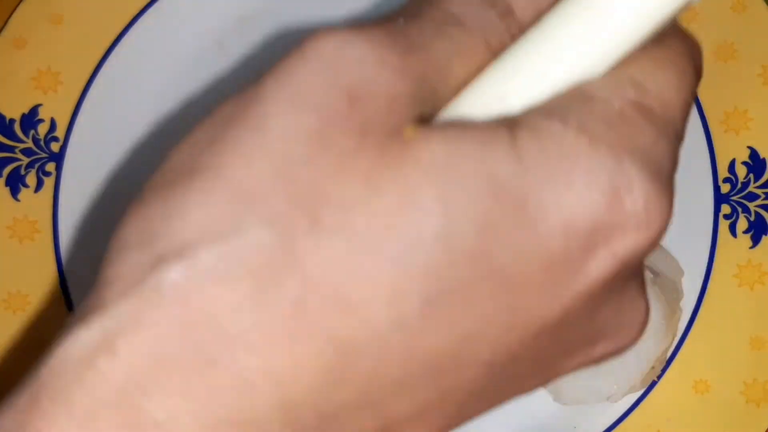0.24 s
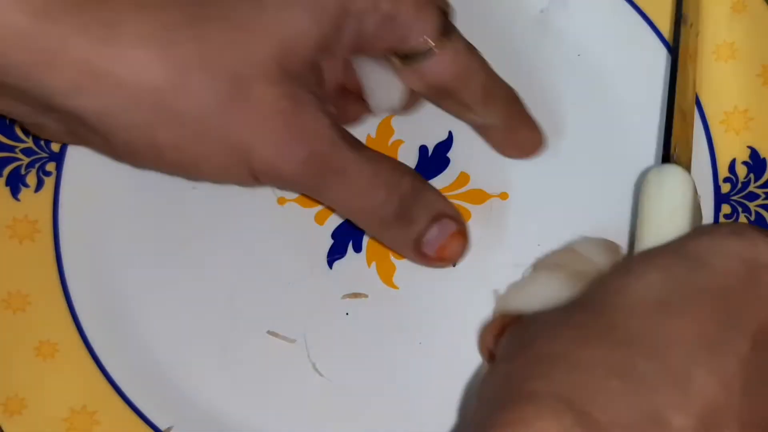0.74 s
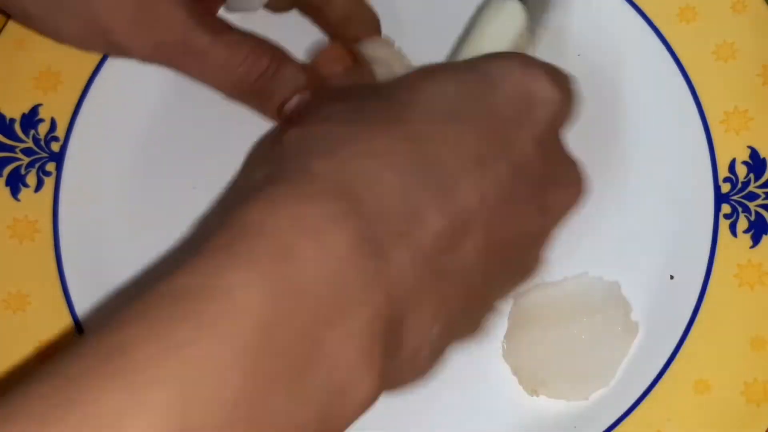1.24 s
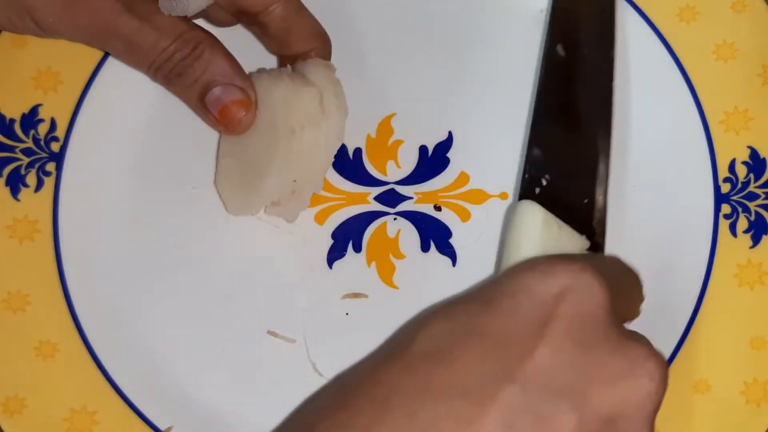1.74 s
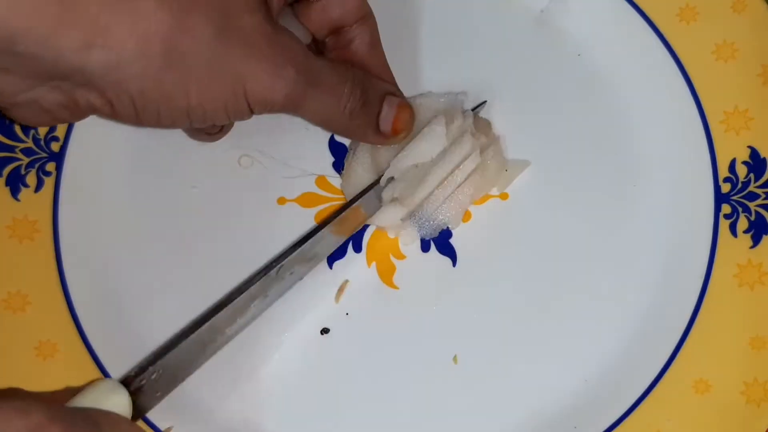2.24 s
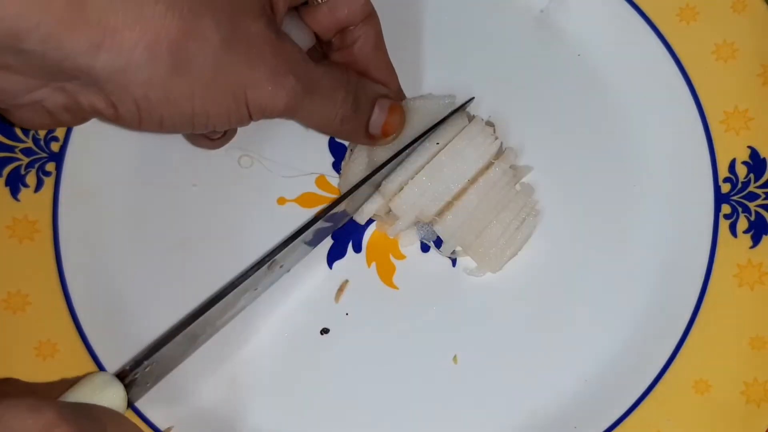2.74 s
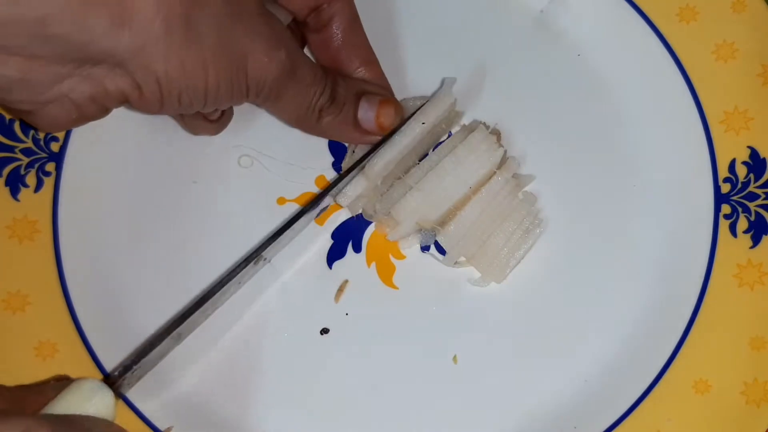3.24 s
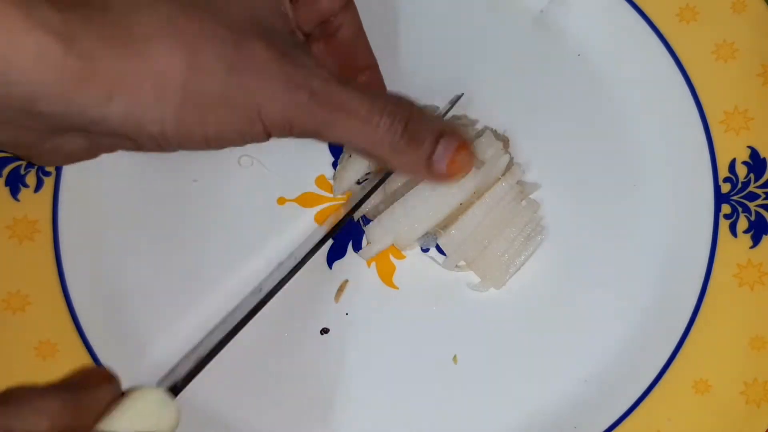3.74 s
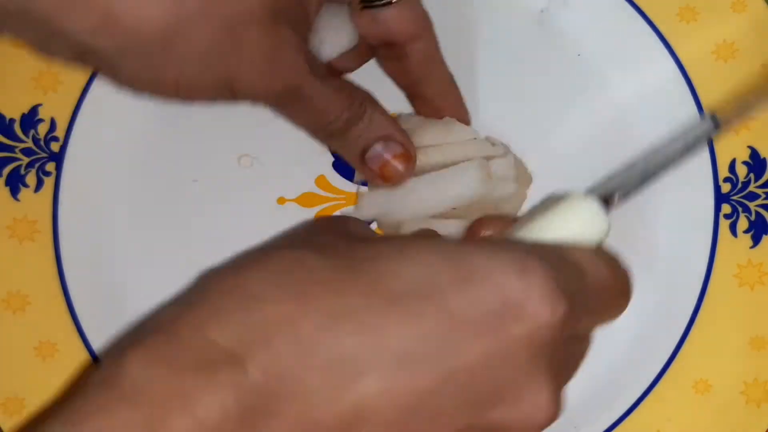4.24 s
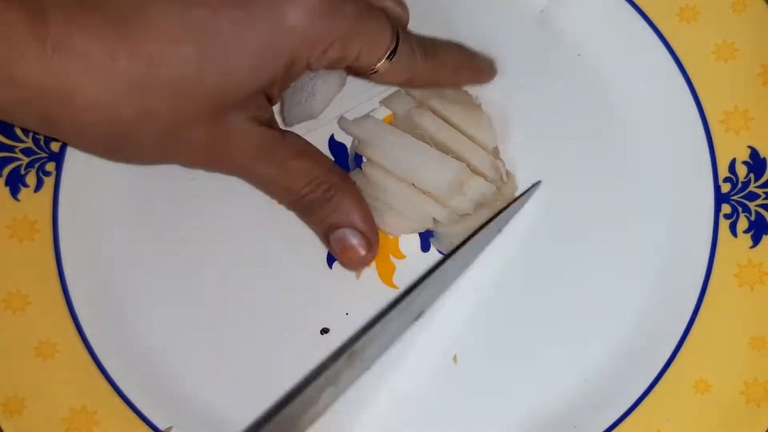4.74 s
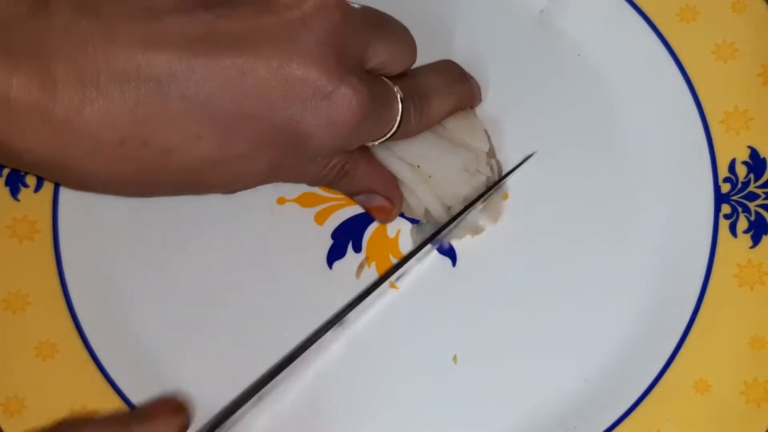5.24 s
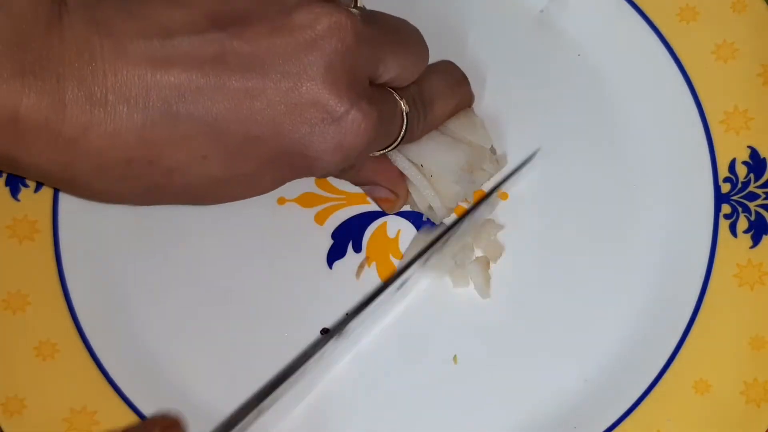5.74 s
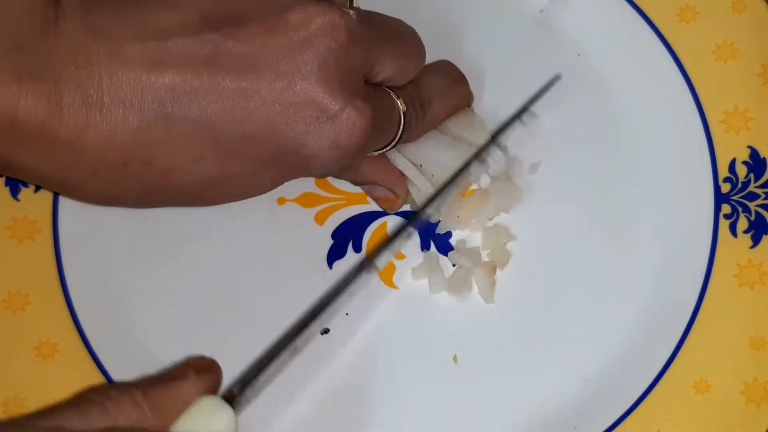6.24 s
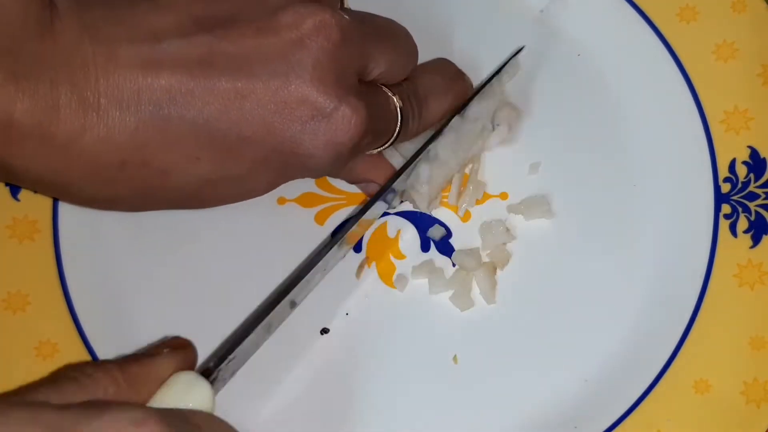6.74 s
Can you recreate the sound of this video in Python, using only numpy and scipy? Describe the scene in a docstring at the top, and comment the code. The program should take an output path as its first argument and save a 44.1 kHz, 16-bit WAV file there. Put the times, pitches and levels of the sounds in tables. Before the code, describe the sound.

A ceramic plate ticks, knocks and buzzes briefly as vegetable pieces are moved, with a short scrape. Then a knife creaks and crunches through the firm flesh three times, each cut ending in a hard click and muffled table thud. A double clack precedes five short, moist, crunchy dicing strokes, evenly spaced. Close microphones, dry small room, soft low room hum and a barely audible high whine.

```python
"""A kitchen knife slices a firm vegetable on a plate, close to a stereo microphone in a small room.
First the pieces are set down and the plate clatters; then three slices each crunch and land with a thud;
at last five quicker, wetter strokes dice them. Filtered random snaps make the cutting and the sliding,
decaying modes make the plate, damped sines make the thuds; sparse echoes, a rumble and a faint whine
make the room."""
import sys
import numpy as np
from scipy import signal
from scipy.fft import rfft, irfft, next_fast_len
from scipy.io import wavfile
from scipy.ndimage import uniform_filter1d

SR = 44100
rng = np.random.default_rng(int(sys.argv[2]) if len(sys.argv) > 2 else 0)


def file_out(sig):
    """Save sig as 16-bit WAV at sys.argv[1]."""
    # one column per channel
    cols = np.atleast_2d(sig).T
    # limit, then scale
    lim = np.clip(cols, -1, 1)
    pcm = np.round(lim * 32767).astype(np.int16)
    wavfile.write(sys.argv[1], SR, pcm)


N = 308259
TIME = np.arange(N) / SR
AGE = TIME[:SR // 8]  # seconds since a contact

# Knife strokes. Each row: landing of the blade in seconds, time to sink through in s,
# shearing effort just before landing in dB, dragging effort afterwards in dB.
STROKES = [(2.283, .16, -57.5, -53), (2.811, 0.19, -61.5, -56), (3.373, .16, -59.5, -55),
           (5.148, 0.034, -42, -53.5), (5.556, 0.037, -42, -48), (6.013, 0.037, -34, -50),
           (6.453, 0.037, -37, -47.5), (6.917, 0.045, -35, -49)]
# Wet pieces flicked by the blade. Each row: time in seconds, effort in dB.
FLICKS = [(2.85, -38), (5.112, -36), (5.266, -49.5), (5.721, -51.5), (6.161, -38.5)]
# Spectrum of bursting cells. Each row: frequency in Hz, relative level in dB.
CELL_SPECTRUM = [(150, -12), (320, 2), (800, -1), (1100, -8.5), (1600, -3), (2300, -9), (4000, -13.5),
                 (7500, -18), (10000, -19.5), (16000, -24.5)]
# Spectrum of juice fizz and of sliding friction. Each row: frequency in Hz, relative level in dB.
FRICTION_SPECTRUM = [(300, -14.5), (1200, -4), (2500, -0.5), (4500, -3.5), (7000, -0.5), (10000, -7),
                     (13000, 0), (16000, 0)]
# Flesh cracking ahead of the blade. Each row: middle in seconds, relative level in dB, resonance in Hz.
CRUNCHES = [(2.167, -35.5, 960), (2.210, -27.5, 910), (2.279, -31, 893), (2.655, -39, 931.6),
            (2.68, -29.5, 847.3), (2.697, -27.5, 969.4), (3.21, -47.5, 1300), (3.235, -36, 1160),
            (3.263, -32, 1029), (3.327, -29, 915), (3.37, -33, 940), (6.858, -40, 1200)]
# Spectrum of snapping fibres for a 1000 Hz resonance. Each row: frequency in Hz, relative level in dB.
FIBRE_SPECTRUM = [(100, -15.5), (300, -11.5), (600, 1), (950, -1.5), (1400, -3.5), (1900, -18),
                  (3000, -26.5), (8000, -31), (16000, -31)]
# Blows on the plate. Each row: start in seconds, relative ring level in dB, ring centre in Hz,
# click level in dB, click tilt in dB per octave, relative level of the hollow knock in dB,
# knock centre in Hz, factor on the decay times, delay of the rebound in s (1 ms or less: no rebound).
BLOWS = [(0.604, -20, 1610, -21.5, 2, -23, 390, 1.1, 0.0028),
         (0.698, -21, 1880, -23, -4, -25, 784, 0.67, 0.0076),
         (1.135, -61, 1600, -40.5, 1.5, -49.5, 416, 1, 0.000087),
         (1.188, -45, 1710, -40, -10, -40, 746, 1.3, 0.00096),
         (1.297, -38, 1600, -33, -2, -30, 534, 0.61, 0.012),
         (1.342, -20, 1950, -15.5, -2.2, -19.5, 240, 0.88, 0.00019),
         (1.345, -20.5, 1550, -21, -6, -13, 560, .9, .0065),
         (1.377, -27, 1920, -33, -0.5, -31, 650, 1.2, 0),
         (1.443, -45.5, 2099, -46, 4, -68, 487, 0.45, 0.00066),
         (1.628, -20, 1800, -22.5, 2, -20.5, 595, 1, .003),
         (1.699, -40.5, 1904, -49, -11, -44, 699.4, 0.84, 0),
         (1.922, -27, 1840, -35, -2.5, -31.5, 648, 2.8, 0.00087),
         (1.955, -27.5, 1980, -44, 1.5, -33.5, 502, 1.33, 0.00077),
         (2.283, -21, 1440, -12, -1, -25.5, 550.2, 0.81, 0.00025),
         (2.533, -44, 1520, -51, -9.5, -50, 783, 0.72, 0),
         (2.811, -20.5, 1540, -16.5, 0, -26, 290, 1.545, 0),
         (3.3733, -18, 1490, -14.5, -2.5, -25.5, 624, 0.8, 0.000083),
         (4.6656, -14, 1441, -14.5, 0, -22.5, 666, 1.423, 0.013),
         (4.805, -42.5, 1480, -53, -7.5, -49.5, 618, 0.96, 0.00024),
         (5.111, -51, 1450, -40, -1, -41.5, 491, 1.5, 0),
         (5.146, -20.5, 1889, -25.5, -1, -32, 449, 0.7, 0.011),
         (5.5565, -14.5, 1940, -16, 0, -26, 362.7, 0.39, 0.00017),
         (5.713, -39, 1592, -51, -2.5, -70.5, 610, 0.63, 0.00096),
         (6.0154, -22, 1670, -16, -0.5, -25.5, 422.7, 0.52, 0.00063),
         (6.453, -24, 1599, -18, -0.5, -28.5, 380, 1.058, 0.00018),
         (6.667, -62, 1504, -47, 13, -46.5, 652, 0.94, 0),
         (6.917, -33, 1850, -28, -7, -29, 453.7, 0.87, 0.00083)]
# Modes of the plate. Each row: frequency in Hz, relative level in dB, nominal 60 dB decay time in s,
# phase between the two microphones in rad.
PLATE_MODES = [(1338, -7, 0.037, 2), (1473, 1, 0.053, 1.8), (1680, -8, 0.057, -1.26),
               (1757, -1.5, 0.033, 5), (1852, -4, 0.04, 2), (2042, -4, 0.05, -1.16),
               (2464, -3.5, 0.042, -1.5), (3210, -15.5, .04, 4), (3310, -13.5, 0.082, -1),
               (3770, -13.5, 0.094, -1.5), (4460, -16.5, 0.14, 0.5), (5300, -17.5, 0.12, -0.5),
               (6320, -19, 0.077, 1), (6370, -12.5, 0.12, 3), (7900, -17, 0.11, 0)]
# Modes of the plate rocking on the table, with the hollow under it. Each row: frequency in Hz,
# relative level in dB, nominal 60 dB decay time in s, phase between the two microphones in rad.
HOLLOW_MODES = [(234.9, -9, 0.14, 0.94), (327, -3.5, 0.099, -0.22), (424.5, -1, .055, 0.4),
                (500, -4.5, 0.055, -1.2), (570.4, 0, 0.061, -2.3), (733.5, 2, 0.052, 0.78),
                (820, -2, 0.049, 0.52), (896.3, 0.5, 0.038, 0.31)]
# Spectrum of hard contact. Each row: frequency in Hz, relative level in dB.
CLICK_SPECTRUM = [(80, -17), (300, -1.5), (700, -3.5), (1000, -6), (1500, 2.5), (2100, -3), (2800, -7.5),
                  (3800, -10.5), (4700, -13), (6000, -8), (8000, -11.5), (9500, -17), (12000, -15.5),
                  (16000, -19)]
# The plate buzzing as it settles. Each row: start in seconds, hold in s, level in dB.
RATTLES = [(0.604, .115, -37.5), (1.356, .04, -34.5), (1.925, 0.047, -39)]
# Dull thuds through the table. Each row: start in seconds, relative level in dB, frequency in Hz,
# 60 dB decay time in s.
THUDS = [(0.31, -34.5, 125, 0.26), (2.2867, -15.5, 103.1, 0.028), (2.8129, -11, 93, 0.043),
         (3.375, -16, 99.1, 0.022), (5.113, -35.5, 106, 0.18)]
# Skin and vegetable sliding over the glaze. Each row: strongest moment in seconds, level in dB,
# rise over 60 dB in s, fall over 60 dB in s.
SLIDES = [(0.34, -53, 0.23, .3), (1.101, -66, 0.92, .6), (1.277, -26, 0.055, .06), (3.75, -81, 1.2, 1.8),
          (4.6, -66.5, 1, 0.71)]
# Reverberation of the room. Each row: frequency in Hz, 60 dB decay time in s.
ROOM_DECAY = [(100, 0.45), (250, 0.44), (420, 0.17), (800, 0.18), (1800, 0.15), (4000, 0.18), (9000, 0.13),
              (16000, 0.19)]
# Spectrum of the room's rumble. Each row: frequency in Hz, relative density in dB per Hz.
RUMBLE_SPECTRUM = [(15, -40), (25, -16), (60, -6), (100, -0.5), (153, -10.5), (256, -6.5), (384, -19),
                   (545, -22), (870, -21), (1150, -31), (1560, -40), (2200, -45.5), (3000, -52),
                   (7000, -48.5), (16000, -48)]
# Swell of the rumble, used about its mean. Each row: time in seconds, relative level in dB.
RUMBLE_SWELL = [(0.0, -54), (1.32, -55), (1.48, -56.5), (2.2, -55), (2.43, -61), (2.72, -58), (3.1, -63),
                (3.35, -60), (3.89, -63.5), (4.59, -53.5), (4.92, -59), (6.99, -54.5)]
# A faint fuzzy whine in the room. Each row: time in seconds, level in dB.
WHINE_LEVEL = [(0, -83.5), (2.6, -94), (4.1, -90.5), (4.5, -83.5), (6.99, -84)]

# A stroke bites in, grows as the blade sinks, then drags on the glaze and lets go;
# BITE_S, LANDED_S and LET_GO_S each span 60 dB.
BITE_S, BUILD_DB, LANDED_S, DRAG_S, LET_GO_S = 0.11, 7, 0.06, 0.091, 0.099
FLICK_RISE_S, FLICK_FALL_S = 0.032, 0.055
CRUNCH_SIGMA_S = 0.0035  # standard deviation of the bell-shaped envelope
# The plate tips and comes back on the table: the later, the weaker; its click is duller.
REBOUND_DB, REBOUND_FADE_DB_PER_S, REBOUND_TILT_DB, REBOUND_KNOCK_HZ = 2, 549.5, -2, 736.7
RATTLE_RISE_S, RATTLE_FALL_S = 0.015, 0.085
RUMBLE_DB = -56
EDGE_HZ = 16050  # upper band limit


def knife_effort():
    """Work of the blade: effort grows with depth while sinking, then passes to dragging and flicking."""
    sinking, dragging = np.zeros(N), np.zeros(N)
    for lands, sink_s, sink_db, drag_db in STROKES:
        depth = np.clip(1 + (TIME - lands) / sink_s, 0, 1)
        bite = envelope(lands - sink_s, sink_s, sink_db, BITE_S, LANDED_S)
        sinking += bite * gain_of(BUILD_DB * (depth - 1))
        dragging += envelope(lands, DRAG_S, drag_db, LANDED_S, LET_GO_S)
    flicking = sum(envelope(s, 0, db, FLICK_RISE_S, FLICK_FALL_S) for s, db in FLICKS)
    return sinking, dragging + flicking


def shearing(clump_db=3, clump_s=0.025, juice_db=-24, juice_follow=0.68, fibre_db=1):
    """Fracture noise: cells burst in uneven clumps, fibres snap as the blade sinks, and juice fizzes."""
    sinking, dragging = knife_effort()
    effort = sinking + dragging
    drift = evened(uniform_filter1d(rng.standard_normal(N), max(int(clump_s * SR), 1)))
    clumps = gain_of(clump_db * drift)
    cells = evened(colour(clumps * grains(N, per_s=3500, spread_db=2.7), CELL_SPECTRUM))
    juice = evened(colour(grains(N, per_s=9700, spread_db=4), FRICTION_SPECTRUM))
    fibres = evened(colour(grains(N, per_s=1500, spread_db=2), FIBRE_SPECTRUM))
    # the fizz follows the effort less than proportionally
    fizz = gain_of(juice_db) * effort ** juice_follow * juice
    return effort * cells + fizz + gain_of(fibre_db) * sinking * fibres


def crunches(gain_db=0.5):
    """Excited resonance: a clump of fibres snaps at once and sounds the damp body of the vegetable."""
    out, middle = np.zeros((2, N)), AGE[len(AGE) // 3]
    for s, db, body_hz in CRUNCHES:
        spectrum = np.array(FIBRE_SPECTRUM) * [body_hz / 1000, 1]  # shifted to this resonance
        shape = np.exp(-((AGE - middle) / CRUNCH_SIGMA_S) ** 2 / 2)
        snaps = grains(len(AGE), per_s=3700, spread_db=0.5) * shape
        add(out, s - middle, gain_of(db + gain_db) * burst(colour(snaps, spectrum)))
    return out


def blows(ring_gain_db=2, knock_gain_db=2, left_db=1.0, soft_db=0.35):
    """Impact excitation: a blow clicks, rings the plate and knocks it on the table; some rebound once."""
    out = np.zeros((2, N))
    for s, ring_db, ring_hz, click_db, tilt_db, knock_db, knock_hz, length, rebound_s in BLOWS:
        contacts = [(s, 0, tilt_db, knock_hz)]
        if rebound_s > 0.001:
            rebound_db = REBOUND_DB - REBOUND_FADE_DB_PER_S * rebound_s
            contacts.append((s + rebound_s, rebound_db, tilt_db + REBOUND_TILT_DB, REBOUND_KNOCK_HZ))
        for at, db, tilt, hollow_hz in contacts:
            # a dull contact leaves the modes far from the ring centre weaker
            rest_db = -9 + soft_db * min(tilt, 0)
            plate = ring(PLATE_MODES, length, ring_hz, focus_db=30, rest_db=rest_db)
            knock = ring(HOLLOW_MODES, length, hollow_hz, focus_db=33.5, rest_db=-10.0)
            sound = gain_of(ring_db + ring_gain_db) * plate * pan(-3.0)
            sound = sound + gain_of(knock_db + knock_gain_db) * knock * pan(0.4)
            sound = sound + gain_of(click_db) * click(tilt, length)
            add(out, at, gain_of(db) * pan(left_db) * sound)
    return out


def ring(modes, length, centre_hz, focus_db, rest_db, spot_db=2.02, split=0.04, twin_db=-6):
    """Modal decay: modes near centre_hz are favoured by the struck spot, each with a weaker twin close by."""
    hz, db, t60, phase = np.transpose(modes)[:, :, None]
    strength, start, apart = rng.standard_normal((3, len(modes), 1))
    focus = np.maximum(-focus_db * np.log2(hz / centre_hz) ** 2, rest_db)
    db = db + focus + spot_db * strength
    # losses in the plate itself limit the ring, most of all in the treble
    longest_s = 0.085 * np.minimum(1750 / hz, 1) ** 0.7
    t60 = np.minimum(t60 * length, longest_s)
    twin = 1 + 1j * gain_of(twin_db) * np.exp(2j * np.pi * hz * split * apart * AGE)
    waves = gain_of(db - 60 * AGE / t60) * twin * np.exp(2j * np.pi * (hz * AGE + start))
    heard = np.array([(waves * np.exp(0.5j * side * phase)).real.sum(0) for side in (1, -1)])
    return burst(heard * (1 - np.exp(-AGE / 0.0028)))  # soft onset


def click(tilt_db, length, snap_s=0.00055, chatter_s=0.0077, chatter=0.3):
    """Hard contact: a sharp snap, then milliseconds of chatter; flesh around the blade cuts it short."""
    snap = np.exp(-AGE / (snap_s * length))
    tail = chatter * np.exp(-AGE / (chatter_s * length))
    shape = (snap + tail) * (1 - np.exp(-AGE / 0.000067))
    noise = ports(rng.standard_normal((2, len(AGE))))
    return burst(colour(noise * shape, CLICK_SPECTRUM, tilt_db))


def rattling(ring_db=1, knock_db=-3):
    """Repeated impact: fast tiny bounces keep the plate and the hollow under it ringing."""
    bounces = grains(N, per_s=4700, spread_db=1.5)
    plate = ring(PLATE_MODES, length=0.82, centre_hz=1910, focus_db=10, rest_db=-5.5)
    rung = signal.oaconvolve(bounces, plate, axes=1)[:, :N]
    hollow = ring(HOLLOW_MODES, length=0.8, centre_hz=680, focus_db=11, rest_db=-6.5)
    knocked = signal.oaconvolve(bounces[:1], hollow, axes=1)[:, :N]
    settling = sum(envelope(s, hold_s, db, RATTLE_RISE_S, RATTLE_FALL_S) for s, hold_s, db in RATTLES)
    clicks = evened(colour(bounces, CLICK_SPECTRUM, tilt_db=-3.0))
    return settling * evened(clicks + gain_of(ring_db) * evened(rung) + gain_of(knock_db) * evened(knocked))


def thuds(after_hz=402, after_db=-27, after_t60=0.45, slap_hz=170, slap_db=-3, slap_t60=0.024):
    """Damped oscillation: the table is pushed and slapped, and a faint low note hangs on."""
    out, t = np.zeros((2, N)), TIME[:SR // 2]
    note = np.sin(2 * np.pi * after_hz * t) * gain_of(after_db - 60 * t / after_t60)
    slap = np.sin(2 * np.pi * slap_hz * t) * gain_of(slap_db - 60 * t / slap_t60)
    for s, db, hz, t60 in THUDS:
        push = np.sin(2 * np.pi * hz * t) * gain_of(-60 * t / t60)
        add(out, s, gain_of(db) * ((push + slap) * pan(7.5) + note))
    return signal.sosfilt(signal.butter(2, 55, "highpass", fs=SR, output="sos"), out)


def rubbing():
    """Sliding friction: dense fine snaps hiss in proportion to the pressure on the glaze."""
    pressure = sum(envelope(s, 0, db, rise_s, fall_s) for s, db, rise_s, fall_s in SLIDES)
    return pressure * evened(colour(grains(N, per_s=20000, spread_db=2.5), FRICTION_SPECTRUM))


def room(x, wet_db=-14, delay_s=0.0046):
    """Reverberation: sparse reflections from near walls, each band dying at its own speed."""
    t = TIME[:SR // 2]
    taps = ports(rng.standard_normal((2, len(t))) * (rng.random((2, len(t))) < 3000 / SR), split_hz=2300)
    hz, age, bands = signal.stft(taps, SR, nperseg=256)
    decay = gain_of(-60 * age / read(ROOM_DECAY, hz)[:, None])
    tail = signal.istft(bands * decay, SR, nperseg=256)[1][:, :len(t)]
    tail = tail * np.clip(t / delay_s - 1, 0, 1)  # silent for one delay, faded in over the next
    tail = tail / np.linalg.norm(tail, axis=1, keepdims=True)
    return gain_of(wet_db) * signal.fftconvolve(x, tail, axes=1)[:, :N]


def air(whine_hz=3610, waver_hz=45, swell_share=0.9):
    """Ambient noise: filtered noise that swells and sinks, and a sine frequency-modulated by slow noise."""
    swell_db = np.interp(TIME, *np.transpose(RUMBLE_SWELL))
    swell = gain_of(swell_share * (swell_db - swell_db.mean()))
    noise = ports(rng.standard_normal((2, N)), split_hz=470)
    rumble = evened(colour(noise, RUMBLE_SPECTRUM, size=8192))
    waver = evened(uniform_filter1d(rng.standard_normal((2, N)), size=300))
    whine = evened(np.sin(2 * np.pi * np.cumsum(whine_hz + waver_hz * waver, axis=1) / SR))
    whine_gain = gain_of(np.interp(TIME, *np.transpose(WHINE_LEVEL)))
    return swell * gain_of(RUMBLE_DB) * rumble * pan(-1.0) + whine_gain * whine


def grains(count, per_s, spread_db):
    """Random impulses: tiny snaps of uneven size, as the two microphones get them."""
    sizes = gain_of(spread_db * np.minimum(rng.exponential(1, count), 4))
    snaps = sizes * (rng.random(count) < per_s / SR)
    return ports(snaps * rng.standard_normal((2, count)))


def ports(pair, split_hz=1100):
    """Spatial coherence: two close microphones hear long waves alike and short waves differently."""
    size = next_fast_len(pair.shape[1])
    a, b = rfft(pair, size)
    apart = np.pi / 4 / (1 + (split_hz / (np.fft.rfftfreq(size, 1 / SR) + 1)) ** 2)
    shared, differing = a * np.cos(apart), b * np.sin(apart)
    return irfft(np.array([shared + differing, shared - differing]), size)[:, :pair.shape[1]]


def colour(x, points, tilt_db=0, size=2048):
    """Minimum-phase filtering: a causal filter with the given spectrum, tilted per octave in the treble."""
    hz = abs(np.fft.fftfreq(size, 1 / SR))
    log_gain = np.log(gain_of(read(points, hz) + tilt_db * np.log2(1 + hz / 1000)))
    taps = np.fft.ifft(np.exp(signal.hilbert(log_gain).conj())).real
    return signal.oaconvolve(x, taps[None, :size // 2], axes=1)[:, :x.shape[1]]


def envelope(start, hold_s, db, attack_s, release_s):
    """Exponential growth and decay around a hold; attack and release each span 60 dB, down to -120 dB."""
    away = np.maximum((start - TIME) / attack_s, (TIME - start - hold_s) / release_s)
    return gain_of(db) * np.exp(-np.log(1000) * np.clip(away, 0, 2))


def read(points, hz):
    """Logarithmic frequency scale: interpolates a spectrum's value at hz."""
    f, value = np.transpose(points)
    return np.interp(np.log(hz + 1), np.log(f + 1), value)


def gain_of(db):
    """Decibel law: level to amplitude."""
    return 10 ** (np.asarray(db) / 20)


def evened(x):
    """Mean power: scales to rms 1."""
    return x / np.sqrt(np.mean(x ** 2) + 1e-20)


def burst(x):
    """Signal energy: scales a short stereo sound to the energy of 5 ms at rms 1."""
    return x / np.sqrt(np.sum(x ** 2) / (2 * 0.005 * SR) + 1e-20)


def pan(db):
    """Level difference between the ears: left and right gains, left louder for positive db."""
    return gain_of(np.array([[db], [-db]]) / 2)


def add(mix, s, sound):
    """Superposition: mixes a stereo sound in at time s."""
    part = mix[:, max(round(s * SR), 0):][:, :sound.shape[1]]
    part += sound[:, :part.shape[1]]


def scene():
    """Superposition of knife, vegetable and plate, their reflections, the thuds and the room's air."""
    near = shearing() + crunches() + blows() + rattling() + rubbing()
    return near + room(near) + thuds() + air()


def record(dry):
    """Saturation and band limit: the loudest peaks are rounded off, then a low-pass filter follows."""
    rounded = dry / (1 + dry ** 6) ** (1 / 6)
    low_pass = signal.firwin(301, EDGE_HZ, window=("kaiser", 9), fs=SR)
    return signal.oaconvolve(rounded, low_pass[None], "same")


dry = scene()
out = record(dry)
file_out(out)
```